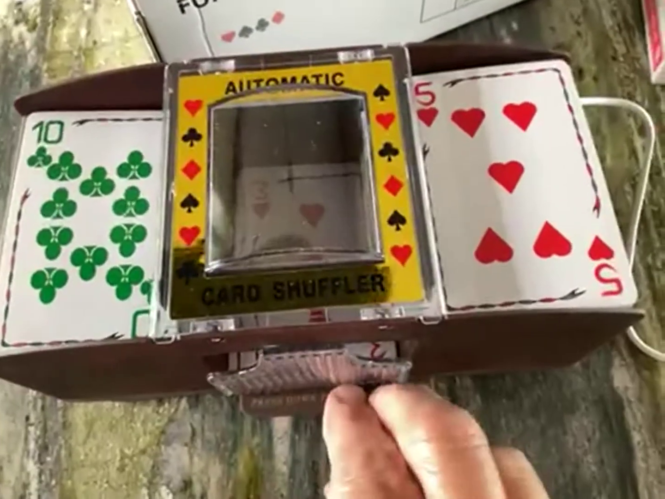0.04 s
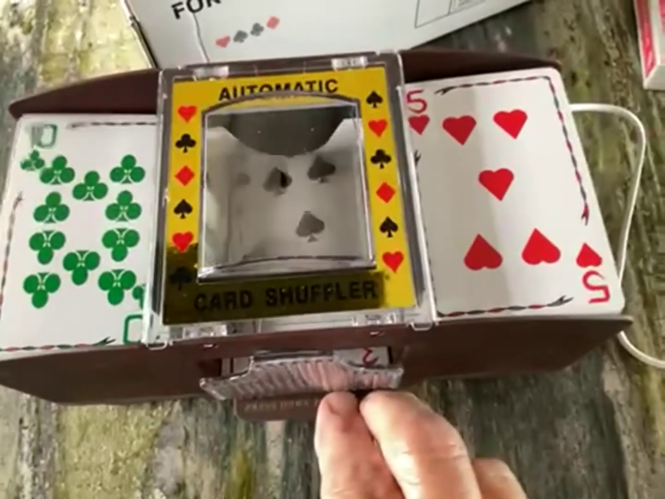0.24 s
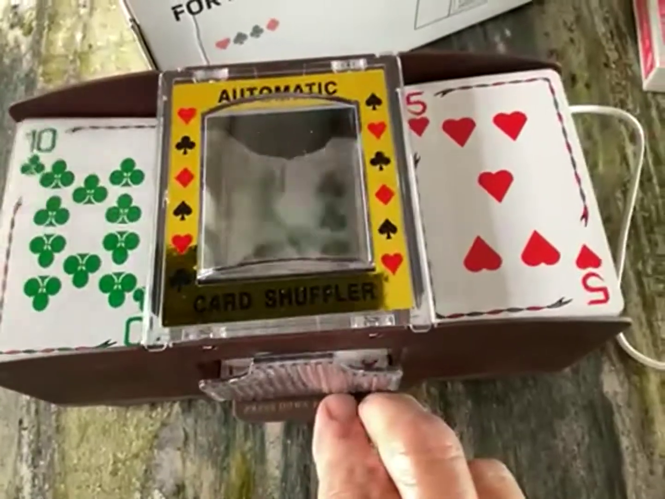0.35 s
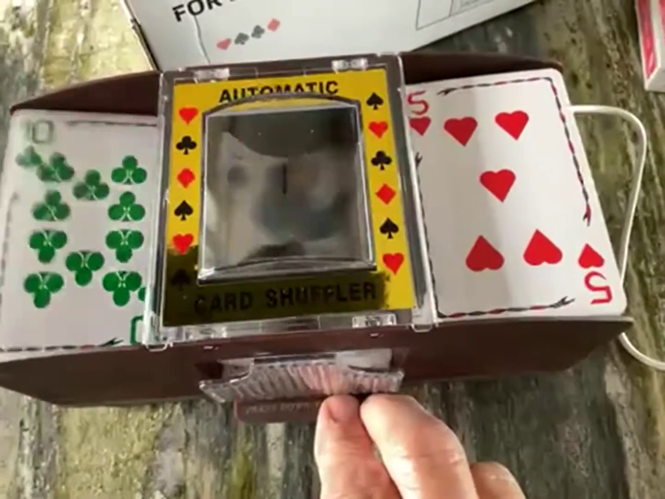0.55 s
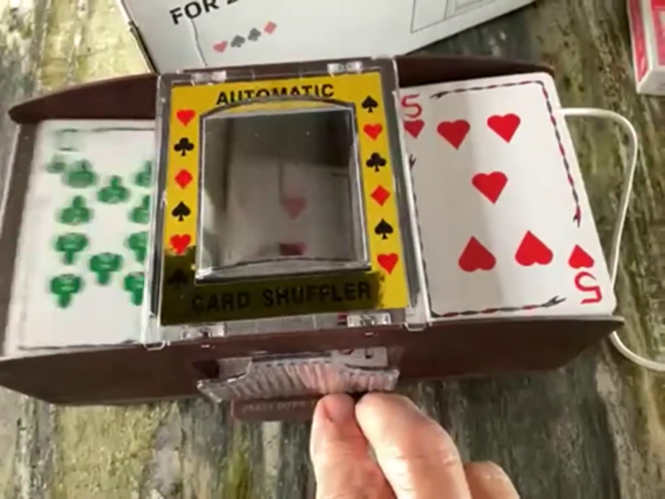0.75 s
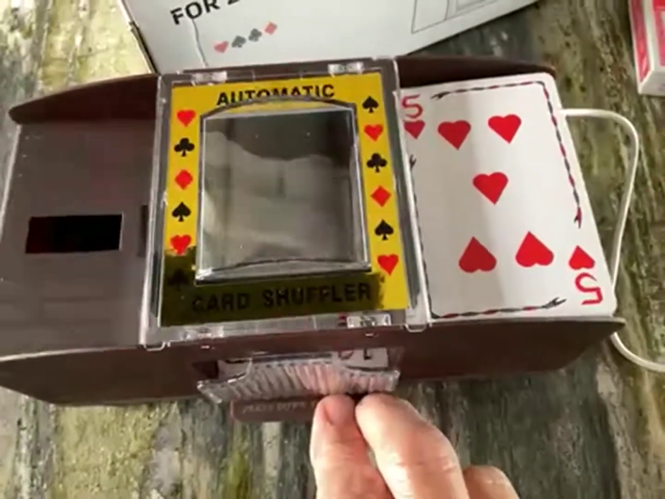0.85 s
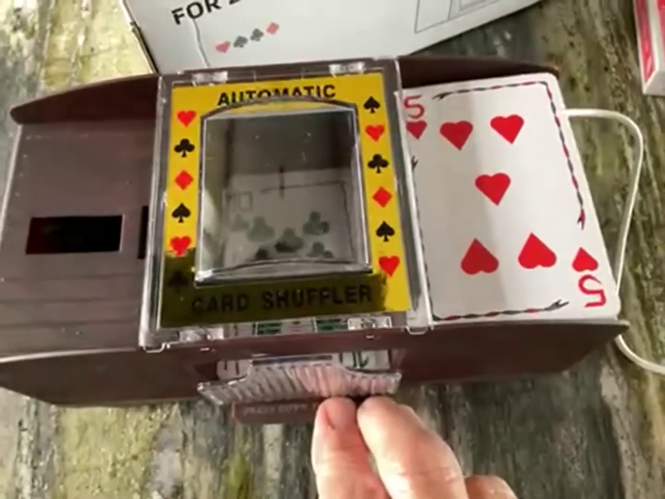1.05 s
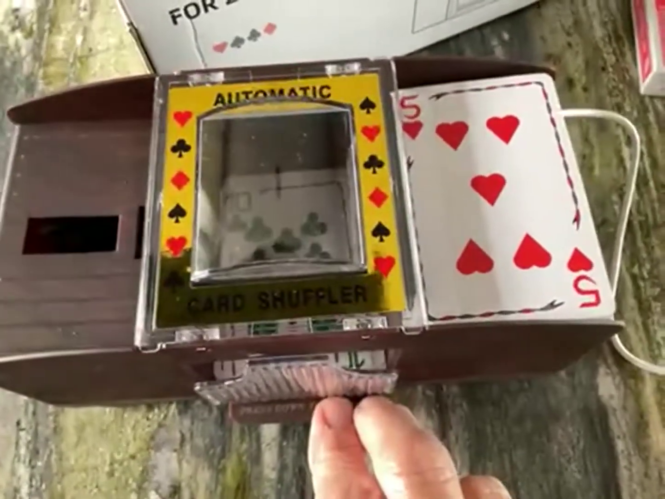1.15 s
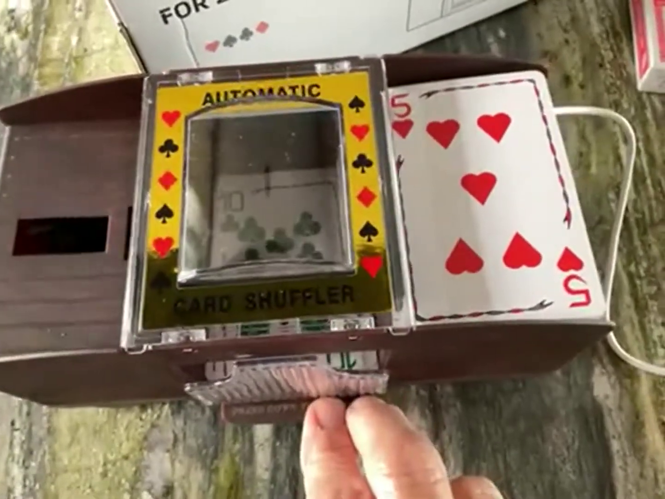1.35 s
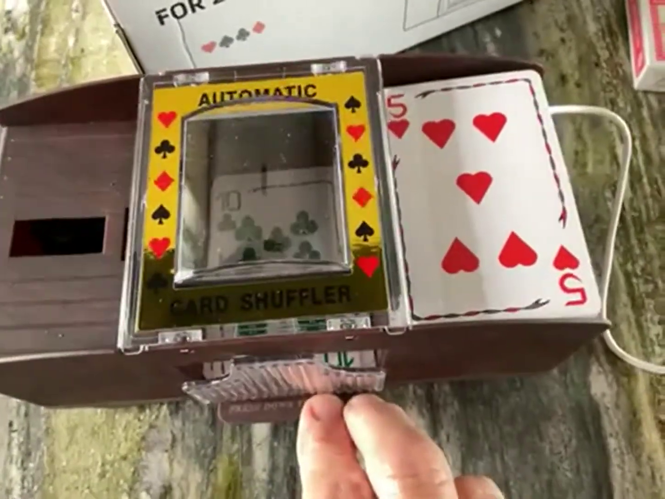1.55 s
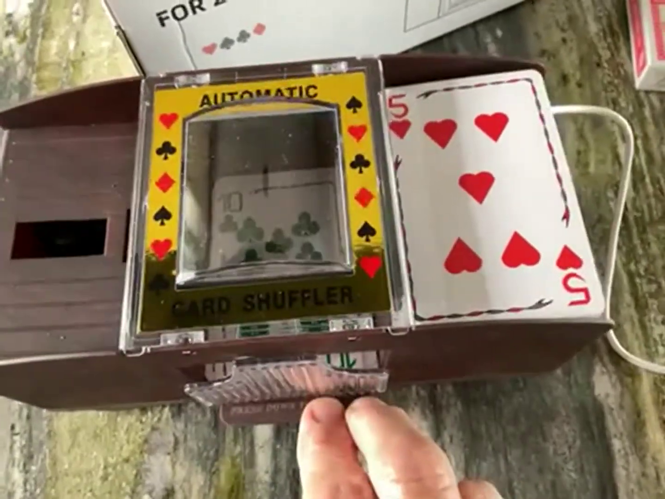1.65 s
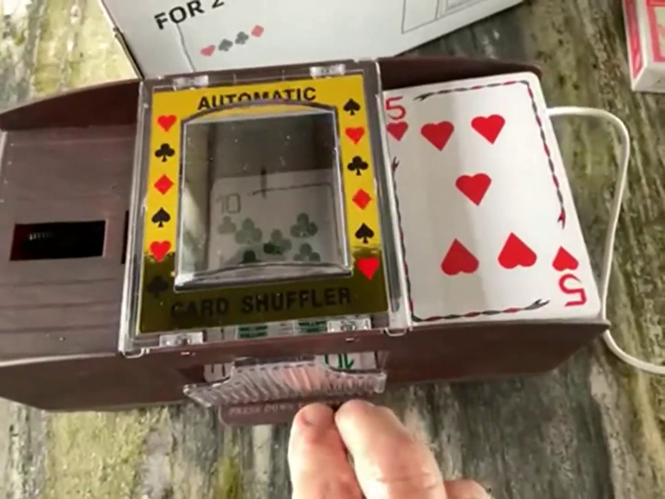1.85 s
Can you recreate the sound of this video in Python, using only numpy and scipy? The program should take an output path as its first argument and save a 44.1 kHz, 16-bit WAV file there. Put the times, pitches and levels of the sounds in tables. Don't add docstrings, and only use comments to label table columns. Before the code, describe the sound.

A small plastic card shuffler starts abruptly with a harsh gear whir, cards sliding and flicking rapidly, then rattles empty with sharp ticks and squeals before slowing to a stop; close microphone in a quiet, humming room.

```python
import sys
import numpy as np
from scipy import signal
from scipy.io import wavfile

SR = 44100
rng = np.random.default_rng(int(sys.argv[2]) if len(sys.argv) > 2 else 0)


def log_audio(samples):
    frames = np.atleast_2d(samples).T
    limited = np.clip(frames, -1, 1)
    pcm = np.round(limited * 32767).astype(np.int16)
    wavfile.write(sys.argv[1], SR, pcm)


def attenuation_scalar(level_db):
    decades = np.asarray(level_db, float) / 20
    return 10 ** decades


N = 83790
PATCH_DB = 1.2


def rms_one(x):
    return x / np.sqrt(np.mean(x ** 2) + 1e-20)


def butter(x, order, hz, kind="low"):
    return signal.sosfilt(signal.butter(order, hz, kind, fs=SR, output="sos"), x)


def curve(rows):
    start_s, level_db = np.transpose(rows)
    return attenuation_scalar(np.interp(np.arange(N) / SR, start_s, level_db, left=-120, right=-120))


def drift(rate_hz):
    settle = 9000
    r = np.exp(-2 * np.pi * rate_hz / SR)
    slow = signal.lfilter([1], [1, -2 * r, r * r], rng.standard_normal(N + settle))
    return rms_one(slow[settle:])


def peak(x, hz, width_hz):
    r = np.exp(-np.pi * width_hz / SR)
    feedback = [1, -2 * r * np.cos(2 * np.pi * hz / SR), r * r]
    return signal.lfilter([(1 - r * r) / 2, 0, (r * r - 1) / 2], feedback, x + 1e-18)


def coloured(x, spectrum, patch_db):
    out = 0
    edges_hz = 35 * 2 ** np.arange(0, 9.1, .5)
    hz, db = np.transpose(spectrum)
    for k, (low, high) in enumerate(zip(edges_hz, edges_hz[1:])):
        level_db = np.interp(np.log(low * high) / 2, np.log(hz), db, left=-70)
        band = butter(x, 2, [low, high], "band")
        out = out + (-1) ** k * attenuation_scalar(level_db + patch_db * drift(20)) * band
    return out


def grains(rate_per_s, spread_db, hiss):
    sizes = attenuation_scalar(spread_db * np.minimum(rng.exponential(1, N), 5)) * rng.choice([-1, 1], N)
    clicks = sizes * (rng.random(N) < rate_per_s / SR)
    return rms_one(clicks) + hiss * rng.standard_normal(N)


def rings(table, swell_s, crack_db=-60):
    length = 1600
    t, out = np.arange(length) / SR, np.zeros(N + length)
    u = t / swell_s
    crack = attenuation_scalar(crack_db) * butter(grains(3000, 1.7, 0.27), 2, 6500, "high")
    for (start_s, level_db, pitch_hz), (turn, other, side) in zip(table, rng.random((len(table), 3))):
        partner_hz = pitch_hz * 1.2 ** np.sign(side - .5)
        tone = np.sin(2 * np.pi * (pitch_hz * t + turn))
        tone = tone + attenuation_scalar(-7) * np.sin(2 * np.pi * (partner_hz * t + other))
        i = int((start_s - swell_s) * SR)
        out[i:i + length] += attenuation_scalar(level_db) * u * np.exp(1 - u) * (tone + crack[i:i + length])
    return out[:N]


# pitch_hz [Hz], density_db [dB per Hz]
AIR = [(45, -8.5), (90, -4.5), (200, 2), (400, -10.5), (1000, -15.5), (2000, -22.5), (6000, -24.5),
       (9000, -33)]
# pitch_hz [Hz], width_hz [Hz], level_db [dB]
DRONE = [
    (55.8, 14, -72),
    (84.5, 7.6, -72),
    (133.6, 7, -56),
    (209.7, 20, -65),
    (243.5, 5.7, -59),
]
# start_s [s], length_s [s], pitch_hz [Hz], level_db [dB]
CREAKS = [
    (.04, .015, 850, -64),
    (.035, .02, 5800, -68),
    (.13, .025, 5800, -66),
]


def room_tone():
    t = np.arange(N) / SR
    out = attenuation_scalar(-55) * rms_one(coloured(rng.standard_normal(N), AIR, 1.0))
    for pitch_hz, width_hz, level_db in DRONE:
        once = peak(rng.standard_normal(N + SR), pitch_hz, width_hz)
        twice = peak(once, pitch_hz, width_hz)
        out = out + attenuation_scalar(level_db) * rms_one(twice[SR:])
    for start_s, length_s, pitch_hz, level_db in CREAKS:
        creak = rms_one(peak(rng.standard_normal(N), pitch_hz, pitch_hz * .07))
        out = out + attenuation_scalar(level_db) * np.exp(-((t - start_s) / length_s) ** 2) * creak
    return out


# start_s [s], level_db [dB]
MOTOR = [(.199, -55), (.208, -30.5), (.224, -29), (.231, -21), (.31, -19), (.6, -25.5), (.8, -23.5),
         (1.0, -24), (1.12, -22), (1.27, -22.5), (1.33, -22.5), (1.45, -20.5), (1.52, -24), (1.63, -31),
         (1.7, -37), (1.765, -43), (1.785, -57.5), (1.9, -75)]
# pitch_hz [Hz], width_hz [Hz], level_db [dB]
CASE = [(400, 98, -10), (847, 300, 0), (1020, 670, -4.5), (2307, 370, 3), (2885, 248, 4), (4017, 220, 0),
        (4570, 670, -0.5), (5900, 86, 6.5), (6400, 250, -2), (7800, 860, -31.5), (8430, 100, -19),
        (10120, 100, -21.5), (12100, 380, -17), (14300, 300, -24)]
# pitch_hz [Hz], density_db [dB per Hz]
WALLS = [(250, -11), (500, -1), (1500, -4.5), (3500, -6.5), (6000, -28.5), (8000, -2.5), (11000, -25),
         (15500, -20.5)]


def gears():
    level = curve(MOTOR)
    catch, burst = knocks()
    pace = np.clip(level / attenuation_scalar(-25), 1e-4, 1)
    teeth = grains(2500 * pace ** 0.31, 1, 0.84) / pace ** 0.14
    body = coloured(teeth, WALLS, PATCH_DB)
    for k, (pitch_hz, width_hz, level_db) in enumerate(CASE):
        body = body + (-1) ** k * attenuation_scalar(level_db + PATCH_DB * drift(25.6)) * peak(teeth, pitch_hz, width_hz)
    body = rms_one(body)
    dulled = pace * body + (1 - pace) * butter(body, 2, 6000)
    wobble = attenuation_scalar(1.42 * drift(72))
    chatter = wobble * catch * dulled + burst * body
    hum_gain = attenuation_scalar(-18) * pace ** -0.61 * np.clip(level / attenuation_scalar(-56), 0, 1)
    hum = hum_gain * rms_one(peak(rng.standard_normal(N), 803.5, 29))
    return level * (chatter + hum)


def echoes(x):
    t60_s, gap_s = 0.19, .004
    t = np.arange(SR // 2) / SR
    noise = signal.lfilter([.4], [1, -.6], rng.standard_normal(len(t)))
    tail = noise * attenuation_scalar(-60 * t / t60_s) * (t > gap_s)
    return attenuation_scalar(-22.5) * signal.fftconvolve(x, tail / np.sqrt(np.sum(tail ** 2)))[:N]


# start_s [s], level_db [peak dB], length_ms [ms], tilt_db [dB per octave]
FLICKS = [(0.206, -21.5, 8.6, -15), (0.228, -10, 3.8, -7.6), (0.2737, -12, 8.2, -0.5), (0.288, 0, 4.7, -10),
          (0.311, -2, 4.5, -1), (0.319, -6.5, 4.8, -6), (0.334, -9, 3.7, 5), (0.3662, 3, 5.2, -9),
          (0.3845, 3.5, 2.9, 1.5), (0.3926, -1, 7.7, -10.5), (0.4178, -1.5, 9.5, 1.5), (0.43, -14, 4.2, 5),
          (0.4672, 4, 4.3, -0.5), (0.4739, 4.5, 5.5, -2.5), (0.5027, 8.5, 7.6, -1), (0.553, 0.5, 6.3, -6),
          (0.5594, 2.5, 5.8, -5), (0.6547, -10.5, 6.8, 4), (0.6867, -11, 9, -9), (0.6938, -2, 11.2, -3.5)]
# pitch_hz [Hz], width_hz [Hz], level_db [dB]
TRAY = [(725, 530, -20.5), (1637, 157, -5), (2660, 450, -8), (3746, 840, -5.5), (4630, 575, -1.5),
        (4870, 150, 0), (5510, 460, -6), (7020, 990, -7), (9240, 1500, -14.5), (14040, 2900, -24.5)]


def flicks():
    length = 3000
    t, out = np.arange(length) / SR, np.zeros(N)
    clatter = rms_one(grains(6800, 6, 0.84))
    colour_db = rng.normal(0, 0.97, (len(FLICKS), len(TRAY)))
    for k, (pitch_hz, width_hz, mode_db) in enumerate(TRAY):
        shape = np.zeros(N)
        for (start_s, level_db, length_ms, tilt_db), own_db in zip(FLICKS, colour_db[:, k]):
            i = int(start_s * SR)
            u = t / (length_ms / 1000 * 0.63)
            bright_db = np.clip(tilt_db, -4, 5) * np.log2(pitch_hz / 3000)
            shape[i:i + length] += attenuation_scalar(level_db + own_db + bright_db) * u * np.exp(.5 - u * u / 2)
        out += (-1) ** k * attenuation_scalar(mode_db) * peak(shape * clatter, pitch_hz, width_hz)
    return out


# start_s [s], level_db [dB]
SLIDE = [
    (.22, -54),
    (.3, -28),
    (.37, -22.5),
    (.43, -17),
    (.49, -17.5),
    (.53, -23.5),
    (.62, -24.5),
    (.72, -26),
    (.85, -32.5),
]
# pitch_hz [Hz], density_db [dB per Hz]
PAPER = [(150, -52.5), (250, -5.5), (658, -13.5), (809, 4.5), (1380, -12), (2950, -6), (3390, -11.5),
         (4390, -1), (15500, -33.5)]


def slide():
    friction = rms_one(coloured(grains(4000, 1.9, 0.57), PAPER, PATCH_DB))
    return curve(SLIDE) * attenuation_scalar(1.3 * drift(46)) * friction


# start_s [s],
# level_db [peak dB], pitch_hz [Hz]
BUZZES = [(.237, -25, 2830), (.249, -23, 5820), (.263, -23, 4460), (.291, -23, 2360), (.387, -16.5, 2660),
          (.395, -17.5, 4300), (.432, -17, 4620), (.463, -19.5, 850), (.477, -17, 1624), (.479, -17, 1010),
          (.691, -21, 1640), (.744, -33, 2430), (.88, -24.5, 2440), (.986, -31, 2920), (1.127, -20.5, 2700),
          (1.151, -21, 2810), (1.42, -30, 2390), (1.461, -21, 3050), (1.584, -31.5, 3000)]


def buzzes():
    return rings(BUZZES, .003)


# start_s [s], level_db [peak dB], pitch_hz [Hz]
THUMPS = [
    (0.263, -21.5, 400),
    (.305, -25, 396),
    (.385, -33.5, 450),
    (0.462, -36, 350),
    (0.612, -27, 381),
]


def thumps():
    t, out = np.arange(N) / SR, 0
    for start_s, level_db, pitch_hz in THUMPS:
        u = np.clip(t - start_s, 0, None) / 0.0034
        push = u * np.exp(-u) * np.sin(2 * np.pi * pitch_hz * t)
        knock = peak(push, pitch_hz, 120)
        out = out + attenuation_scalar(level_db) * knock / np.abs(knock).max()
    return out


# start_s [s], level_db [peak dB], pitch_hz [Hz]
PINGS = [(.276, -33, 14460), (.314, -28, 14600), (.745, -29, 12040), (.831, -27, 12000), (.887, -32, 12170),
         (.946, -29.5, 12190), (1.0, -40.5, 12120), (1.092, -25, 12100), (1.115, -23.5, 12130),
         (1.155, -32, 11870), (1.217, -25.5, 12090), (1.29, -32.5, 12400), (1.346, -34.5, 12100)]


def pings():
    return rings(PINGS, .0015, -4)


# start_s [s], level_db [peak dB], pitch_hz [Hz]
SLAPS = [(0.601, -20, 4320), (0.632, -21, 4670), (0.653, -26, 4330), (0.659, -19.5, 4380),
         (0.699, -23, 4570), (0.766, -21, 5730), (0.797, -23, 4140), (0.813, -25, 5440), (0.851, -23, 4700),
         (0.864, -18, 4940), (0.872, -17, 5740), (0.932, -30, 4840), (0.947, -21, 4840), (0.973, -28, 4600),
         (0.985, -30, 4850), (1.048, -23, 5800), (1.082, -23, 4800), (1.108, -20, 4730),
         (1.154, -14.5, 4830), (1.192, -22, 4340), (1.223, -16.5, 4640), (1.317, -14, 4720),
         (1.337, -16.5, 5260), (1.365, -21, 5240), (1.397, -17, 4040), (1.436, -17, 4820),
         (1.457, -16, 4960), (1.493, -25.5, 4850), (1.53, -20.5, 4900), (1.567, -24.5, 5200),
         (1.579, -23, 4820), (1.633, -22.5, 4900), (1.647, -29, 4920), (1.661, -27, 4820),
         (1.705, -44.5, 4880)]


def slaps():
    return rings(SLAPS, .0018, -25)


# start_s [s], knock_db [dB over the chatter], depth_db [dB], length_ms [ms]
KNOCKS = [(0.602, 9.5, -2.5, 5.7), (0.65, -4, -4.5, 5), (0.765, -6, 8, 5.3), (.809, 6.5, -6.5, 5.4),
          (0.85, 0, -4, 40), (0.899, -11, 9, 8.8), (0.97, -1, -1.5, 4), (1.028, 3.5, 1, 3.1),
          (1.046, -2.5, 4.5, 12), (1.105, 1, -3.5, 8), (1.149, -11, -2, 3.1), (1.19, -8.5, 3.5, 19),
          (1.217, -1, -6, 3.1), (1.308, -3, -6, 9.1), (1.335, 2, -2, 1.7), (1.366, -12, -5, 4),
          (1.394, -4.5, -2.5, 6.1), (1.529, 0, 6.5, 2.1), (1.579, 1.5, -3, 5.8), (1.631, 1, -4, 5.7),
          (1.647, -7, 1.5, 4.3), (1.659, 6, -0.5, 3.4), (1.736, -2, 4.5, 3), (1.747, 2.5, 6.5, 4)]


def knocks():
    catch_s, rise_s = 0.0038, .001
    t, catch_db, burst = np.arange(N) / SR, np.zeros(N), np.zeros(N)
    for start_s, knock_db, depth_db, length_ms in KNOCKS:
        dip = np.exp(-((t - start_s + catch_s) / catch_s) ** 2) * (t < start_s)
        catch_db -= max(depth_db, 0) * dip
        decay = np.exp(-np.abs(t - start_s) * 1000 / length_ms)
        burst += attenuation_scalar(knock_db) * decay * np.clip((t - start_s) / rise_s, 0, 1)
    return attenuation_scalar(catch_db), burst


# start_s [s], level_db [dB]
FREE = [
    (.8, -33),
    (.86, -28),
    (1.12, -22),
    (1.26, -25),
    (1.36, -20),
    (1.46, -21),
    (1.56, -30.5),
    (1.66, -39),
    (1.73, -64),
]
# pitch_hz [Hz], width_hz [Hz], level_db [dB]
SHAFT = [(4820, 110, -8.5), (4906, 340, 1.5), (5220, 350, -1.5), (5816, 73, -2), (4160, 250, -2),
         (787.4, 19, 2), (2406, 75, 1.5), (12100, 300, -21), (14500, 300, -23.5)]


def shaft():
    catch, burst = knocks()
    ticks = grains(2200, 1.0, 0.64) * attenuation_scalar(.8 * drift(90)) * (catch + 0.62 * burst)
    ringing = 0
    for pitch_hz, width_hz, level_db in SHAFT:
        ringing = ringing + attenuation_scalar(level_db + drift(2.2)) * peak(ticks, pitch_hz, width_hz)
    return curve(FREE) * rms_one(ringing)


# start_s [s], level_db [peak dB], pitch_hz [Hz]
BOOMS = [(0.806, -30, 935), (0.895, -26, 856), (0.948, -31, 827), (0.977, -27.5, 950), (1.061, -25.5, 785),
         (1.091, -27, 844), (1.116, -32, 820), (1.161, -39, 845), (1.401, -24, 835), (1.501, -22.5, 774),
         (1.541, -29, 772), (1.614, -33, 770), (1.663, -29.5, 744), (1.773, -46.5, 765)]


def booms():
    return rings(BOOMS, 0.00495)


def scene():
    machine = gears() + flicks() + slide() + buzzes() + thumps() + pings() + slaps() + shaft() + booms()
    overload = .92
    machine = overload * np.tanh(machine / overload)
    machine = butter(machine, 6, 319, "high")
    air = butter(room_tone(), 3, 8000)
    return (machine + echoes(machine) + air)[None]


def top_cut(x):
    return signal.sosfilt(signal.butter(12, 15770, fs=SR, output="sos"), x)


def record(dry):
    top_hz = 15900 * 1.03
    mix = signal.sosfilt(signal.cheby2(10, 50, top_hz, fs=SR, output="sos"), dry)
    return top_cut(mix)


dry = scene()
out = record(dry)
log_audio(out)
```